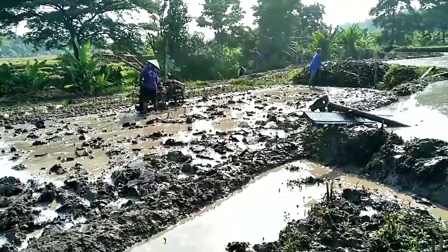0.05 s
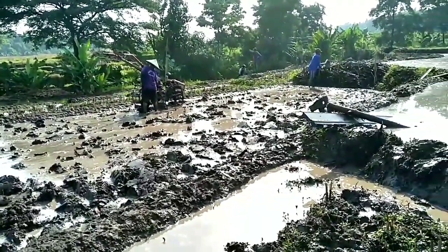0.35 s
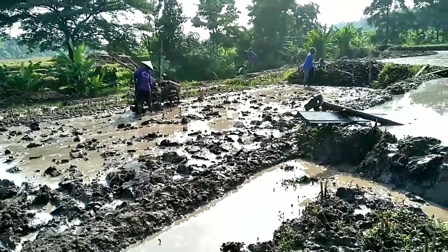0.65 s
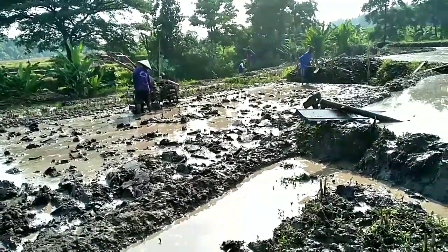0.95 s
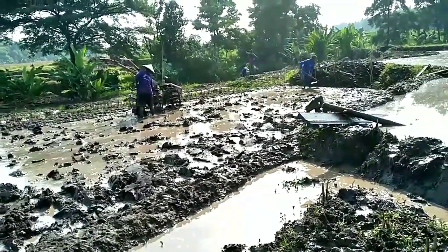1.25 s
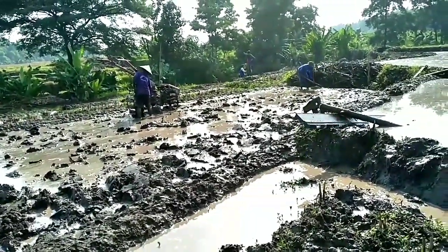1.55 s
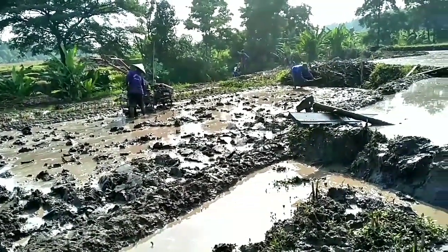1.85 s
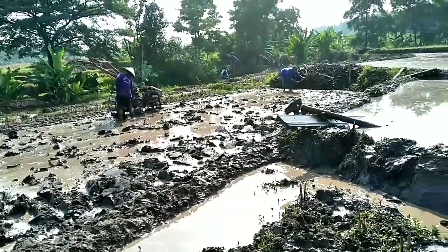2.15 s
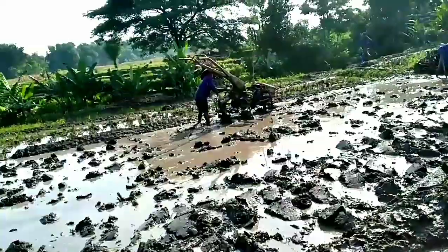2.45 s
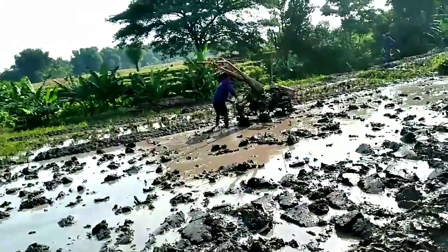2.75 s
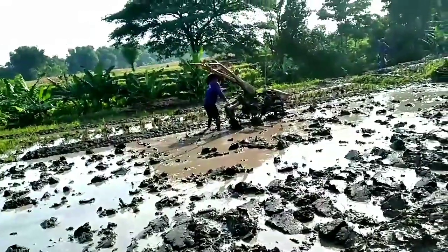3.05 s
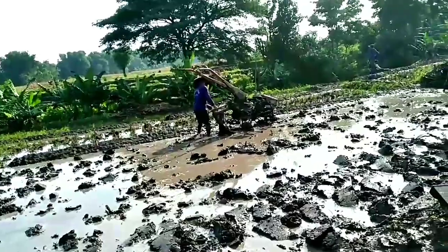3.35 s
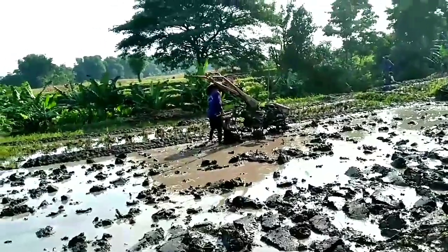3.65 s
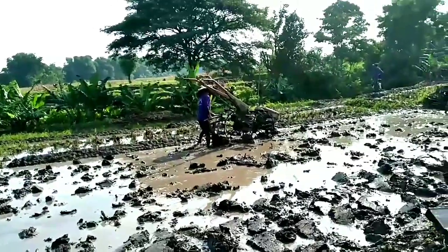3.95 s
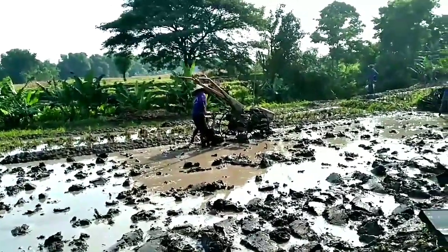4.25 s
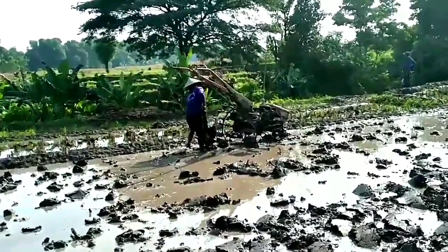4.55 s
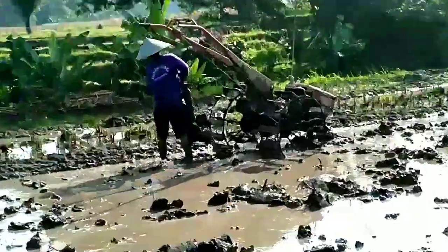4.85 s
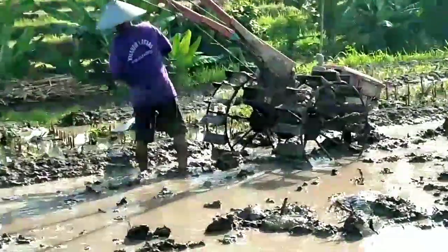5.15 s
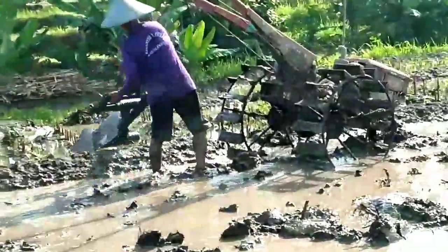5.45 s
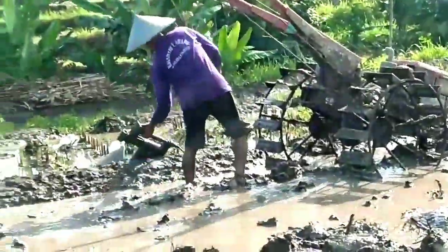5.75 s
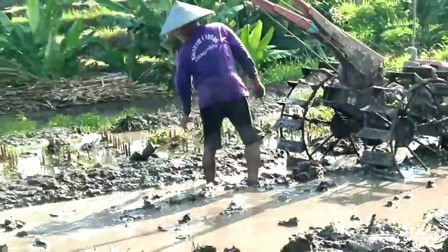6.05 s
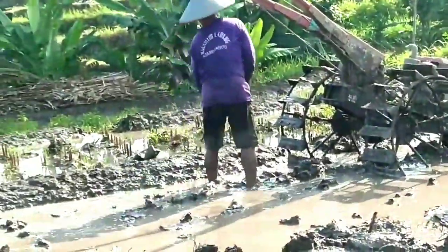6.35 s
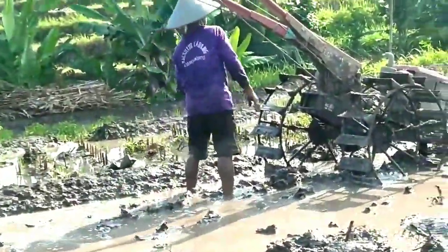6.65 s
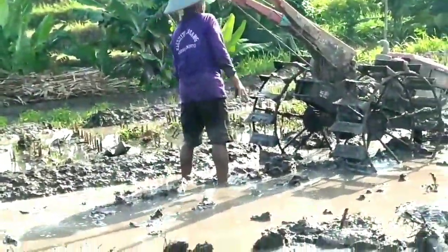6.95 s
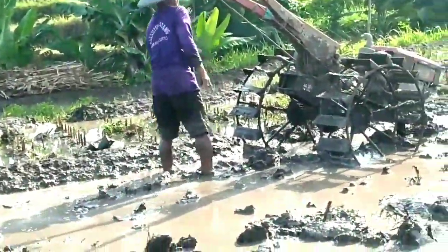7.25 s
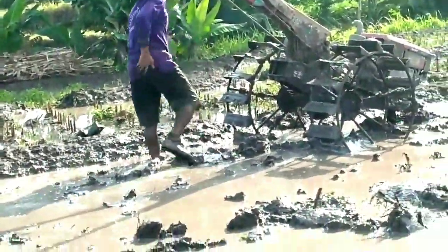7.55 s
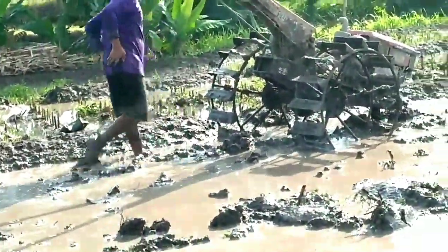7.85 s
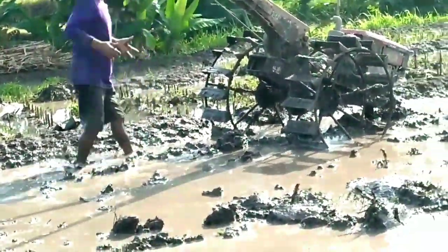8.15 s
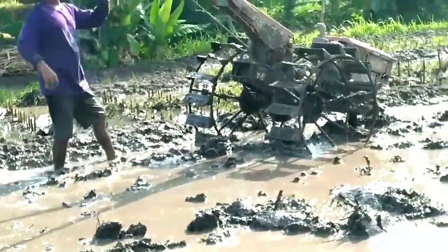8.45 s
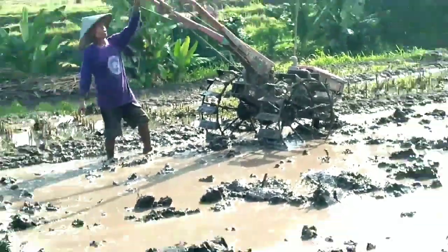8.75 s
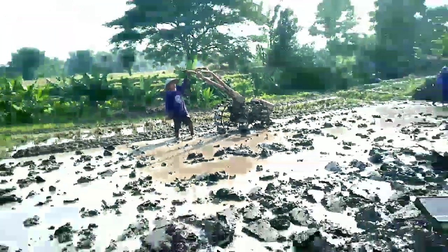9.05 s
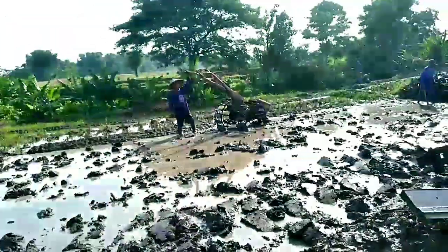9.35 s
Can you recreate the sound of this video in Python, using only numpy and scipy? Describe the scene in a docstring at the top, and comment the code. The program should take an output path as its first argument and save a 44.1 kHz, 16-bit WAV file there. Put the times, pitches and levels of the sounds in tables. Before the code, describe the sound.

A single-cylinder diesel tractor idles with an even chug, distant at first and then close, with a few iron tool clanks and faint crickets.

```python
"""A two-wheel tractor's single-cylinder diesel idles in a flooded field, first far off, then close.
Every firing knocks the block, then blows down the exhaust: a low chug, a rasp and a bright hiss.
The beat is even; the puffs limp at first, then even out as the clatter swells, and no two firings
have quite the same colour. An iron tool clanks as it is handled and thrown aside, loose metal clinks
and hollow knocks sound farther off. Crickets trill with their wings over a faint wash of open air."""
import sys
import numpy as np
from scipy import signal
from scipy.fft import rfft, irfft
from scipy.io import wavfile

SR = 44100
rng = np.random.default_rng(int(sys.argv[2]) if len(sys.argv) > 2 else 0)


def waveform_to_disk(signal):
    """Save audio, clipped to [-1, 1], as 16-bit WAV at the path in sys.argv[1]."""
    frames = np.transpose(np.atleast_2d(signal))
    scaled = np.clip(frames, -1, 1) * 32767
    samples = np.round(scaled).astype(np.int16)
    wavfile.write(sys.argv[1], SR, samples)


N = 418950
T = np.arange(N) / SR
HZ = np.fft.rfftfreq(4096, 1 / SR)

CLOSE_FROM_S = 2.56
# the governor holds a steady idle: first_exhaust_s, period_s
BEAT_FAR, BEAT_CLOSE = (.0685, .14965), (2.6322, .14934)
LIMP_SHARE = 0.2  # dB of strong-weak alternation per dB that the swell lies below zero
SWELL_CHUG_DB = -0.17  # dB of chug per dB of swell: fullest while the engine is still weak
THUD_MAX_DB = -33  # harder knocks add clatter, not weight

# drive of knock, rasp, hiss and sizzle, a row each: level_db, spread_db, limp_db, swell_share
DRIVE_FAR = [(-43, .8, 0, 0), (-49, 1.2, .8, 0), (-39.5, .8, .8, 0), (-33.2, .7, .6, 0)]
DRIVE_CLOSE = [(-32, 0.34, 0, 0.23), (-33.5, 0.13, 0.011, 0.74), (-31.5, 0.17, 0, 0.56),
               (-23, 0.97, 0, 0.6)]
# level rides on the engine: time_s, gain_db
SWELL = [(2.63, -13), (3.1, -9.5), (3.4, -7), (3.68, 3.5), (4.101, 1), (5.3, 1.8), (5.8, 4.5), (6.5, 2),
         (7.899, 3), (8.7, 2.5), (9.3, 4.5)]  # builds as the engine comes close, then holds
KNOCK_RIDE = [(2.63, -3), (2.93, 0.5), (3.25, -1.5), (3.85, 2.5), (4.2, -0.5), (5.3, -0.5), (6.6, 1.5),
              (7.2, -2.5), (7.9, -0.5), (8.7, -3.5), (9, 3.5), (9.4, 1.5)]
GUARD_RIDE = [(2.63, -37), (2.85, -28), (3.25, -35), (4, -25), (6, -22), (7, -42), (9.3, -43)]
HISS_FAR_RIDE = [(.1, -3), (.6, 2.5), (1.1, -8), (1.6, -1.5), (2.3, 5)]
# early firings that puff harder or softer than the rest: time_s, gain_db
ODD_PUFFS = [(.068, 2), (.218, 0), (.368, 0.5), (.667, 2.5), (.817, -9.5), (1.116, 0), (2.014, -3.5),
             (2.463, -4), (2.632, 3), (2.782, -6), (2.931, 0), (3.08, -3)]
# envelopes of each layer within one firing: delay_s, rise_s, decay_s, level_db
KNOCK_FAR = [(-.033, 0.01, 0.012, 1.9), (-.022, 0.0064, 0.012, 0.014)]
KNOCK_CLOSE = [(-.0305, 0.0056, 0.0061, 3), (-.019, 0.0046, 0.013, 1)]
THUD = [(-0.021, 0.0071, 0.013, -9.5)]
AFTER_RING = [(-0.029, 0.0097, 0.085, 0)]
GUARD_SHAKE = [(-.029, 0.0059, 0.0055, -9.5), (-.02, .011, 0.17, -18)]
TICK = [(-0.0317, 0.0038, 0.0022, 0)]
RASP = [(-.004, 0.019, 0.041, -2), (0.031, 0.016, 0.023, -3.5)]
HISS_FAR = [(.002, 0.005, 0.04, 4)]
HISS_CLOSE = [(-.009, 0.0056, 0.043, -4), (.004, 0.014, 0.04, 1)]
SIZZLE_FAR = [(-.003, 0.0063, 0.01, -1), (.004, 0.012, 0.022, 2.5)]
SIZZLE_CLOSE = [(-.012, 0.0089, .01, -4), (.002, 0.0062, 0.014, 6), (.033, .005, .011, .5),
                (.059, .0057, 0.021, -11.5)]
# pressure swings in the silencer after one firing: delay_s, pitch_hz, half_length_s, peak_db
CHUG_SWINGS = [(.0238, 91.4, .0071, -27.1), (.0575, 114.5, .008, -31.4), (.083, 116, .009, -47),
               (.108, 174, .016, -45.5)]
# modes of the engine block: pitch_hz, width_hz, far_db, close_db
BLOCK_MODES = [(363, 40, -13, -6), (526, 75, -0.5, -2), (741.6, 46, 6, 3), (967, 170, -40, -4.5),
               (1225, 110, -3.5, -3), (1450, 54, -13, -9), (1620, 86, -11.5, -1.5), (1950, 60, -7.5, -6.5),
               (2120, 80, -17.5, -2.5), (2576, 115, -17.5, -4.5), (3120, 340, -50, -16.5)]
# modes of the other engine parts: pitch_hz, width_hz, level_db
CRANKCASE_MODES = [(356.4, 52, -0.5), (438, 77, -1), (524, 100, -0.5)]
SHELL_MODES = [(188, 70, -34), (332, 31, -16), (510, 85, -16), (810, 74, 3.5), (883, 65, 4), (1146, 160, 3),
               (1441, 153, 3.5), (1680, 160, -1.5), (2024, 130, 2), (2167, 130, 2), (2500, 90, 4),
               (2710, 120, -8), (3080, 180, -5.5)]  # the silencer's shell, rattled by the exhaust
GUARD_MODES = [(2532, 84, -6), (2005, 59, -15.5)]  # a loose sheet-metal guard, shaken by each knock
STEEL_MODES = [(8200, 85, -6.5), (8520, 55, -9), (8690, 50, -7), (9020, 70, -7), (9280, 60, -1.5),
               (9510, 70, -7), (10300, 120, -12), (10600, 55, -13), (11000, 60, -15)]  # thin steel rung by the exhaust
RING_FAR_MODES = [(750, 73, 1.5), (1404, 85, -14.5), (2255, 39, -2)]  # what keeps ringing between firings
RING_CLOSE_MODES = [(865, 65, -4), (1470, 80, 1), (2175, 70, -3), (2495, 30, -2)]
# tone curves of the exhaust layers and the injector's tick: frequency_hz, level_db
RASP_FAR_EQ = [(200, -7), (450, -29), (700, -3), (900, -4), (1500, 5), (2400, 1.5), (3200, -20),
               (4500, -10), (7000, -22)]
HISS_FAR_EQ = [(1000, -20), (2700, -25), (3050, -6.5), (3500, -18.5), (4300, -6), (5500, -5.5), (7000, 0.5),
               (10000, 1), (11500, -4.5), (12700, -2), (14500, -18), (15500, -48)]
HISS_CLOSE_EQ = [(1000, -15.5), (2800, -2), (4000, 2.5), (5600, -2.5), (6600, 4.5), (10000, -11),
                 (11700, 0.5), (12700, 0), (14000, -3.5), (15000, -19), (15600, -10)]
SIZZLE_EQ = [(5500, -30.5), (6900, -5), (7400, 2.5), (8200, 7), (9400, 7), (10200, 1), (11000, -9.5),
             (13000, -12.5)]
TICK_EQ = [(2500, -21), (5000, -7), (7000, -13), (9500, -4), (11000, -10), (12700, -5), (14000, -8),
           (15500, -11)]

# blows on the tool: start_s, rise_s, decay_s, level_db, tilt_db_per_octave, left_db, ring_hz, ring_db
CLANKS = [(0.049, 0.0081, 0.03, -22, -3.5, 5, 1107, -5.5), (5.678, 0.0037, 0.025, -21, -4, 6, 1390, -24),
          (5.741, 0.015, 0.058, -25, -3.5, 6, 770, -20), (5.884, 0.0015, 0.019, -22.5, -7, 7, 1530, -7),
          (5.952, .003, 0.015, -36, 0, 6, 604, 4), (5.978, 0.0056, 0.028, -14, 1, 4.5, 7900, -7.5),
          (6.086, 0.0025, 0.018, -15, 2.5, 4.5, 8060, -27), (6.243, 0.0034, 0.017, -18, -1.5, 4, 1400, 2),
          (6.249, 0.008, 0.0088, -8.5, 4, 4, 6624, -3), (6.268, 0.0032, 0.087, -23.5, -1.5, 6.5, 6600, -15)]
# modes of the iron tool: pitch_hz, width_hz, level_db
IRON_MODES = [(281, 20, -7), (350, 79, -10), (570, 36, 1), (744, 72, 7.5), (1170, 110, -14),
              (1376, 300, 3.5), (2130, 550, 2.5), (3180, 1100, -6.5), (3970, 230, -7), (5860, 2100, -1.5),
              (6620, 140, -8), (7640, 160, -11), (8000, 540, -2), (8770, 440, 2.5), (9950, 580, 0.5),
              (11900, 2300, -7.5)]
# the iron's roll-off in the top octave: frequency_hz, level_db
IRON_EQ = [(12800, 7), (15000, -19)]
# light clinks of loose metal: start_s, decay_s, level_db, pitch_hz, second_mode_hz, second_mode_db
CLINKS = [(.484, 0.01, -65, 1940, 760, 6), (.639, .018, -47, 1940, 750, 5),
          (.785, 0.013, -40.5, 1256, 2000, -17), (1.105, 0.038, -52, 2200, 1480, -11),
          (1.275, 0.018, -50, 1470, 2200, -15), (1.41, 0.016, -47, 2170, 780, -1),
          (1.682, 0.021, -45.5, 1210, 2280, -7), (3.785, 0.0051, -24, 1500, 3730, -10),
          (3.803, 0.053, -37, 1170, 2040, 1), (3.822, 0.023, -36, 1502, 2500, -5),
          (5.428, 0.0081, -29, 2930, 2050, -3)]
# dull knocks farther off: start_s, rise_s, decay_s, level_db, pitch_hz, overtone_db
HOLLOW_KNOCKS = [(0.05, 0.0028, 0.069, -35, 493, -18), (1.873, 0.0093, 0.036, -34, 790, -13),
                 (2.906, 0.0037, 0.023, -32, 545, -7), (3.359, 0.0043, 0.025, -37.5, 540, -12),
                 (3.55, 0.025, 0.085, -41, 560, -17)]
# cricket trills: start_s, end_s, level_db, pitch_hz
TRILLS = [(.855, 1.089, -32.5, 7970), (1.28, 1.465, -31, 8000), (3.45, 3.648, -40.5, 7750),
          (3.8, 4.017, -43, 7950), (6.33, 6.52, -42, 7560), (8.45, 8.613, -41, 7600),
          (8.75, 8.912, -44, 7460)]
# bands of a fainter insect: pitch_hz, width_hz, level_db
INSECT_BANDS = [(9390, 115, 17.5), (9820, 62, 19)]
# tone curves of the open-air wash and its low rumble: frequency_hz, level_db
FIELD_EQ = [(15, -59), (25, -18), (101, 2.5), (264, -19), (749, -23), (952, -25), (2240, -27), (3180, -37),
            (4750, -35.5), (8100, -20.5), (12800, -43), (15000, -53)]
RUMBLE_EQ = [(15, 1), (25, -1), (40, 3), (60, 4), (90, 1), (180, 7), (400, -45.5)]
# scatter off clods and water, relative to the direct sound: frequency_hz, level_db
SCATTER_EQ = [(80, -28), (300, -36), (700, -14), (1500, -4), (3000, 7.5), (7000, 7), (15000, 9)]


def engine_far():
    """From afar the knock is a soft, hollow chuff; the injector ticks; the hiss is thin and ragged."""
    times, knock_db, rasp_db, hiss_db, sizzle_db = firings(BEAT_FAR, CLOSE_FROM_S, DRIVE_FAR)
    block = [(hz, width, far) for hz, width, far, close in BLOCK_MODES]
    knock = pulses(times, knock_db, KNOCK_FAR, alike=.35, grain_db=1, vary_db=.8, apart=.07,
                   tint_db=2.5, tint_hz=237.6, loose_s=.0013)
    rasp = pulses(times, rasp_db, RASP, alike=.17, grain_db=5.5, vary_db=-2.5, apart=.46,
                  tint_db=5.5, tint_hz=188.4)
    knock = rattled(knock, times, block, detune=.015, vary_db=2)
    rasp = rattled(rasp, times, block, detune=.025, vary_db=4, tilt=spectrum(RASP_FAR_EQ))
    ring = pulses(times, knock_db, AFTER_RING, alike=.16, grain_db=-1, vary_db=1.5, apart=.27)
    ring = colour(ring, resonances(RING_FAR_MODES))
    tick = pulses(times, knock_db, TICK, alike=.35, grain_db=3, vary_db=2.5, loose_s=.0005)
    tick = colour(tick, spectrum(TICK_EQ))
    hiss_db = hiss_db + puff_accents(times) + ride(times, HISS_FAR_RIDE)
    hiss = pulses(times, hiss_db, HISS_FAR, alike=.1, grain_db=3.5, vary_db=.7, apart=.6,
                  tint_db=4, tint_hz=220, flutter_db=3)
    hiss = colour(hiss, spectrum(HISS_FAR_EQ))
    sizzle = pulses(times, sizzle_db + puff_accents(times), SIZZLE_FAR, alike=.1, grain_db=3,
                    vary_db=1, apart=.9, tint_db=3.5, tint_hz=150, flutter_db=3)
    sizzle = colour(sizzle, spectrum(SIZZLE_EQ))
    lows = pan(amp(-3.4) * chug(times), left_db=6.5)  # long waves pass over the clods unscattered
    mids = place(amp(1) * knock + amp(1.5) * rasp + amp(-8.5) * ring, left_db=5.5)
    highs = place(amp(1.5) * hiss + amp(2) * sizzle + amp(3) * tick, left_db=2)
    return lows + mids + highs


def engine_close():
    """Close by, the block knocks twice, the silencer rattles and thin steel sings with the exhaust."""
    end_s = T[-1] + BEAT_CLOSE[1] / 2
    times, knock_db, rasp_db, hiss_db, sizzle_db = firings(BEAT_CLOSE, end_s, DRIVE_CLOSE, SWELL)
    block = [(hz, width, close) for hz, width, far, close in BLOCK_MODES]
    steel = spectrum(SIZZLE_EQ) + amp(14) * resonances(STEEL_MODES)
    knock_db = knock_db + ride(times, KNOCK_RIDE)
    knock = pulses(times, knock_db, KNOCK_CLOSE, alike=.35, grain_db=2, vary_db=.5, apart=.1,
                   tint_db=2.5, tint_hz=158.4, loose_s=.001)
    knock = rattled(knock, times, block, detune=.008, vary_db=1)
    thud = pulses(times, np.minimum(knock_db, THUD_MAX_DB), THUD, alike=.66, grain_db=3.5,
                  vary_db=3, apart=.03, loose_s=.0013)
    thud = colour(thud, resonances(CRANKCASE_MODES))
    rasp = pulses(times, rasp_db, RASP, alike=.1, grain_db=4, vary_db=.5, apart=.15,
                  tint_db=2.8, tint_hz=130.4, flutter_db=2.5)
    rasp = gas_bend(rattled(rasp, times, SHELL_MODES, detune=.012, vary_db=1.5))
    ring = pulses(times, rasp_db, AFTER_RING, alike=.12, grain_db=6.5, vary_db=3.5, apart=.13)
    ring = colour(ring, resonances(RING_CLOSE_MODES))
    guard_db = ride(times, GUARD_RIDE)
    guard = pulses(times, guard_db, GUARD_SHAKE, alike=.15, grain_db=6.5, vary_db=1.5, apart=.17)
    guard = colour(guard, resonances(GUARD_MODES))
    tick_db = np.full(len(times), -29.5)
    tick = pulses(times, tick_db, TICK, alike=.23, grain_db=.5, vary_db=5, loose_s=.0005)
    tick = colour(tick, spectrum(TICK_EQ) + amp(-7) * steel)
    hiss = pulses(times, hiss_db + puff_accents(times), HISS_CLOSE, alike=.06, grain_db=3.5,
                  vary_db=.5, apart=.3, tint_db=4.5, tint_hz=170, flutter_db=1.5)
    hiss = colour(hiss, spectrum(HISS_CLOSE_EQ))
    sizzle = pulses(times, sizzle_db + puff_accents(times), SIZZLE_CLOSE, alike=.1, grain_db=3.5,
                    vary_db=.6, apart=.51, tint_db=1.5, tint_hz=159.3, flutter_db=1.5)
    sizzle = colour(sizzle, steel)
    lows = pan(amp(-.2 + SWELL_CHUG_DB * ride(T, SWELL)) * chug(times), left_db=7)
    mids = place(amp(-1) * knock + thud + amp(1.5) * rasp + amp(-6.5) * ring + guard, left_db=5.5)
    highs = place(hiss + tick, left_db=2) + place(sizzle, left_db=7)
    return lows + mids + highs


def firings(beat, end_s, layers, swell=((0, 0),), jitter_s=.0003):
    """Times of an even beat, then each layer's level at every firing: swell, limp and chance."""
    first_s, period_s = beat
    times = np.arange(first_s, end_s, period_s)
    chance = rng.standard_normal((len(times), 1 + len(layers))).T
    swell_db = ride(times, swell)
    strong_weak = (-1) ** np.arange(len(times))
    drive_db = swell_db + LIMP_SHARE * strong_weak * np.maximum(-swell_db, 0)
    levels = [db + spread_db * luck + limp_db * strong_weak + share * drive_db
              for (db, spread_db, limp_db, share), luck in zip(layers, chance[1:])]
    return times + jitter_s * chance[0], *levels


def puff_accents(times):
    """How much harder or softer than usual each firing blows down, in dB."""
    return sum(db * (abs(times - at) < BEAT_FAR[1] / 2) for at, db in ODD_PUFFS)


def pulses(times, levels_db, bursts, alike, grain_db, vary_db, apart=.82,
           tint_db=0, tint_hz=200, loose_s=.0032, flutter_db=0):
    """Noise bursts at every firing; the share `alike` repeats, the rest is fresh turbulence."""
    lead, t = SR // 20, T[:SR // 4] - 1 / 20  # room for bursts before the exhaust opens
    pattern, turbulence = rng.standard_normal(len(t)), grit(grain_db, apart)
    flutter = amp(flutter_db * wobble(step_s=.005))  # gusts within a puff
    out = np.zeros((2, N + SR))
    for start, level_db in zip(times, levels_db):
        chance = rng.standard_normal((len(bursts), 2))
        power = sum((amp(db + vary_db * loud) * burst(t - delay - loose_s * late, rise, decay)) ** 2
                    for (delay, rise, decay, db), (loud, late) in zip(bursts, chance))
        at = round(start * SR) - lead + np.arange(len(t))
        noise = np.sqrt(alike) * pattern + np.sqrt(1 - alike) * turbulence[:, at % N]
        out[:, at] += amp(level_db) * np.sqrt(power) * tinted(noise, tint_db, tint_hz)
    return out[:, :N] * flutter / np.sqrt(np.mean(flutter ** 2))


def chug(times, vary_db=0):
    """Each blow-down kicks the air in the silencer, which swings back weaker and higher."""
    t, kicks = T[:SR // 5], np.zeros(N)
    swing = sum(amp(db) * np.exp(-((t - delay) / half) ** 2 / 2) * np.sin(2 * np.pi * hz * (t - delay))
                for delay, hz, half, db in CHUG_SWINGS)
    at = np.round(times * SR).astype(int)
    at = at[at < N]
    kicks[at] = amp(vary_db * rng.standard_normal(len(at)))
    return signal.oaconvolve(kicks, swing)[:N]


def rattled(x, times, modes, detune, vary_db, tilt=1):
    """Loose parts seat differently at every firing, so each mode shifts in pitch and strength."""
    out = np.zeros((2, N + SR))
    edges = np.r_[0, np.round((times[1:] - .04) * SR).astype(int), N]  # just ahead of each knock
    for start, end in zip(edges, edges[1:]):
        luck = rng.standard_normal((len(modes), 2))
        seated = [(hz * (1 + detune * shift), width, db + vary_db * loud)
                  for (hz, width, db), (shift, loud) in zip(modes, luck)]
        ring = colour(x[:, start:end], resonances(seated) * tilt)
        out[:, start:start + ring.shape[1]] += ring
    return out[:, :N]


def gas_bend(x, bend_s=.00012, step_s=.017):
    """Gusts of hot gas pull the resonances up and down within each stroke."""
    return np.array([np.interp(T + bend_s * wobble(step_s), T, side) for side in x])


def tool_clanks(ring_width_hz=74):
    """Scraping blows rattle the iron tool; each brings out one ringing mode of its own."""
    iron = resonances(IRON_MODES) * spectrum(IRON_EQ)
    noise = grit(grain_db=2.5, apart=.08)
    t, out = T[:SR // 2], np.zeros((2, N))
    for start, rise, decay, db, tilt_db, left_db, ring_hz, ring_db in CLANKS:
        at = round(start * SR) + np.arange(len(t))
        body = iron * amp(tilt_db * np.log2(np.maximum(HZ, 700)))
        ring = resonances([(ring_hz, ring_width_hz, 0)])
        tone = np.hypot(body / np.linalg.norm(body), amp(ring_db) * ring / np.linalg.norm(ring))
        clank = colour(noise[:, at] * burst(t, rise, decay), tone)[:, :len(t)]
        out[:, at] += pan(amp(db) * clank, left_db)
    return place(out, left_db=-2, scatter_t60=.041)


def metal_clinks(rise_s=.0021, width_hz=170):
    """Loose metal parts scrape briefly and ring in two broad modes."""
    t, out = T[:SR // 4], np.zeros((1, N))
    for start, decay, db, hz, second_hz, second_db in CLINKS:
        modes = resonances([(hz, width_hz, 0), (second_hz, width_hz, second_db)])
        ring = colour(rng.standard_normal(len(t)) * burst(t, rise_s, decay), modes)
        out[:, round(start * SR) + np.arange(len(t))] += amp(db) * ring[:, :len(t)]
    return place(out, left_db=15, scatter_t60=.066)


def hollow_knocks(width_hz=96, overtone_ratio=2.03):
    """Dull knocks from farther off, each ringing at a pitch and one overtone."""
    noise, out = grit(grain_db=-1), np.zeros((2, N))
    for start, rise, decay, db, hz, overtone_db in HOLLOW_KNOCKS:
        modes = resonances([(hz, width_hz, 0), (hz * overtone_ratio, width_hz, overtone_db)])
        out += amp(db) * colour(noise * burst(T - start, rise, decay), modes)
    return place(out, left_db=3)


def crickets(strokes_per_s=151, fall_hz=900, waver_hz=30, swell_s=.064, flutter_db=1.2):
    """Each wing stroke is a short, falling chirp; a trill holds its pitch, swells and stops quickly."""
    out = np.zeros(N)
    for start, end, db, hz in TRILLS:
        on = (T > start) & (T < end)
        t = T[on] - start
        stroke, number = t * strokes_per_s % 1, (t * strokes_per_s).astype(int)
        sharp, loud = rng.standard_normal((256, 2))[number].T
        pitch_hz = hz + waver_hz * sharp + fall_hz * (.5 - stroke)
        tone = amp(flutter_db * loud) * np.sin(2 * np.pi * np.cumsum(pitch_hz) / SR)
        chirps = 2 * np.sin(np.pi * stroke) ** 2 * tone
        envelope = np.minimum(t / swell_s, 1) * signal.windows.tukey(len(t), .16)
        out[on] += amp(db) * envelope * chirps
    return out * amp([[-4], [1]])


def field_wash():
    """A faint bed of open air, a little louder once the engine is close."""
    wash = colour(grit(grain_db=1, apart=.14), spectrum(FIELD_EQ))
    return place(wash, left_db=3.5) * amp(np.where(T < CLOSE_FROM_S, -51.5, -48))


def faint_insect():
    """A high, grainy buzz that comes and goes off to the right."""
    knots = T[::SR // 12]
    waver = np.clip(np.interp(T, knots, rng.standard_normal(len(knots))) + .95, 0, 1.5)
    buzz = colour(grit(grain_db=11.5), resonances(INSECT_BANDS))
    return buzz * waver * amp([[-58], [-43.5]])


def air_rumble(far_db=-60, close_db=-52):
    """A low, uneven rumble of air under the chug."""
    low = colour(grit(grain_db=.5, apart=.054), spectrum(RUMBLE_EQ))
    return place(low * amp(np.where(T < CLOSE_FROM_S, far_db, close_db)), left_db=3.5)


def place(x, left_db, scatter_t60=.062, drift_hz=.1688):
    """Direct sound plus ground scatter that differs at each ear and drifts as the listener moves."""
    share, lead = spectrum(SCATTER_EQ), 256
    turn = 2 * np.pi * drift_hz * T
    tails = [[reflections(scatter_t60) for side in range(2)] for path in range(2)]
    first, second = share * rfft(tails, 2 * len(HZ) - 2)
    direct, out = np.ones((1, len(HZ))), 0
    for weight, path in (1, direct), (np.cos(turn), first), (np.sin(turn), second):
        taps = np.roll(irfft(path / np.sqrt(1 + share ** 2 / 2)), lead, axis=1)
        out = out + weight * signal.oaconvolve(x, taps, axes=1)[:, lead:lead + N]
    return pan(out, left_db)


def reflections(t60):
    """A dying train of random reflections, of unit energy."""
    t = T[:SR // 2]
    taps = rng.standard_normal(len(t)) * np.exp(-np.log(1000) * t / t60)
    return taps / np.linalg.norm(taps)


def grit(grain_db, apart=0):
    """Stereo noise whose strength jumps each millisecond; the share `apart` is each ear's own."""
    knots = T[::44]
    x = np.sqrt(1 - apart) * rng.standard_normal(N) + np.sqrt(apart) * rng.standard_normal((2, N))
    x *= amp(grain_db * np.interp(T, knots, rng.standard_normal(len(knots))))
    return x / x.std()


def tinted(x, tint_db, tint_hz):
    """Favours a random set of bands, each about tint_hz wide, and keeps the power."""
    hz, luck = np.fft.rfftfreq(x.shape[-1], 1 / SR), rng.standard_normal(512)
    gain = amp(tint_db * np.interp(hz / tint_hz, np.arange(len(luck)), luck))
    return irfft(rfft(x) * gain / np.sqrt(np.mean(gain ** 2)), x.shape[-1])


def colour(x, gain):
    """Rings x through a minimum-phase filter of unit energy, shaped like the given gain."""
    log_gain = np.log(np.maximum(gain / gain.max(), 1e-5))
    mirrored = np.r_[log_gain, log_gain[-2:0:-1]]
    ring = np.fft.ifft(np.exp(np.conj(signal.hilbert(mirrored)))).real
    return signal.oaconvolve(np.atleast_2d(x), ring[None] / np.linalg.norm(ring), axes=1)[:, :N]


def resonances(modes):
    """Gain at every frequency of a set of modes."""
    return np.sqrt(sum(amp(db) ** 2 / (1 + ((HZ - hz) / width) ** 2 * np.sqrt(np.pi)) ** 2
                       for hz, width, db in modes))


def spectrum(points):
    """Gain at every frequency, from points joined on a log axis."""
    hz, db = np.transpose(points)
    return amp(np.interp(np.log(HZ + 1), np.log(hz), db))


def burst(t, rise, decay):
    """An envelope that swells to 1 and dies away."""
    attack = np.sin(np.pi / 2 * np.clip(t / rise, 0, 1)) ** 2
    return attack * np.exp(-np.maximum(t - rise, 0) / decay)


def wobble(step_s):
    """A random curve that glides to a new value every step."""
    return np.interp(T / step_s, np.arange(N // 50), rng.uniform(-.81, 1, N // 50) * np.sqrt(3))


def ride(times, points):
    """A fader's level in dB at the given times."""
    return np.interp(times, *np.transpose(points))


def pan(x, left_db):
    """Leans a sound to the left by left_db."""
    return x * amp([[left_db / 2], [-left_db / 2]])


def amp(db):
    """Decibels to gain."""
    return 10 ** (np.asarray(db) / 20)


def scene():
    """The engine far then close, the handled tool and small knocks, insects and open air."""
    engine = engine_far() + engine_close()
    knocks = tool_clanks() + metal_clinks() + hollow_knocks()
    return engine + knocks + crickets() + field_wash() + faint_insect() + air_rumble()


def record(dry, ceiling=.9, cutoff_hz=15600):
    """Rounds off the loudest peaks, then trims the very top with a steep low-pass."""
    rounded = dry / (1 + (dry / ceiling) ** 6) ** (1 / 6)
    lowpass = signal.firwin(511, cutoff_hz, window=("kaiser", 9), fs=SR)
    return signal.oaconvolve(rounded, lowpass[None], "same")


dry = scene()
out = record(dry)
waveform_to_disk(out)
```